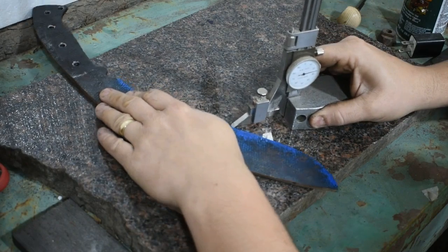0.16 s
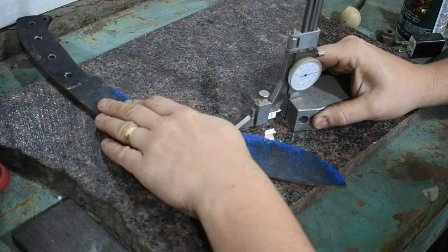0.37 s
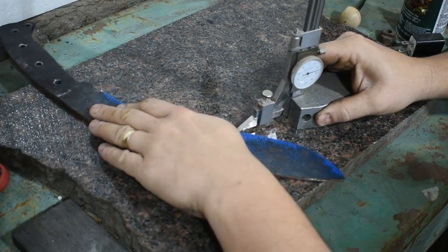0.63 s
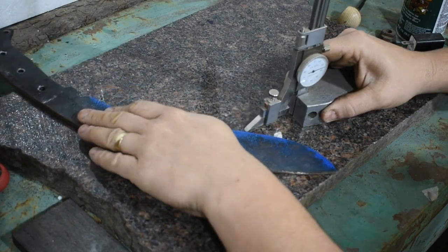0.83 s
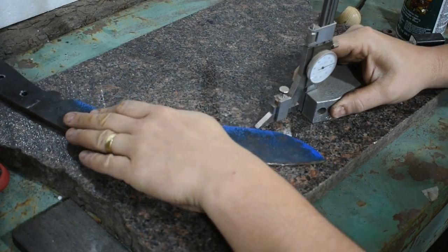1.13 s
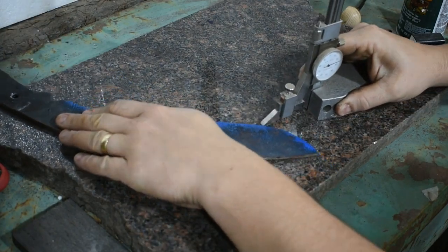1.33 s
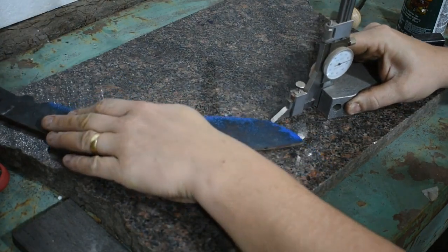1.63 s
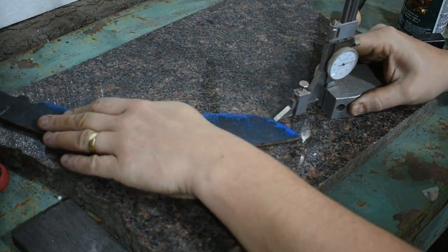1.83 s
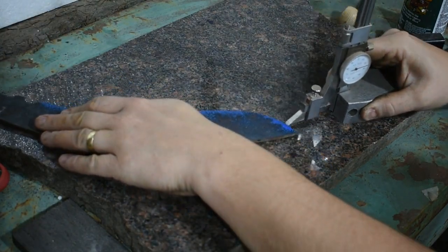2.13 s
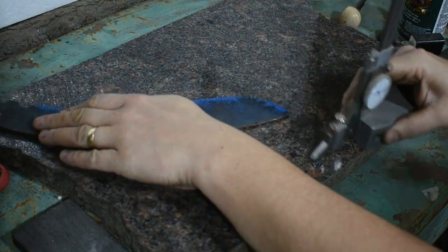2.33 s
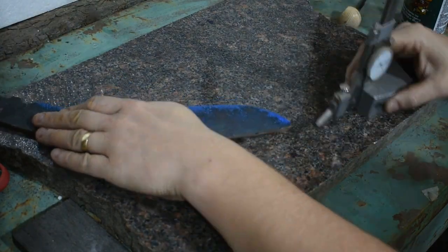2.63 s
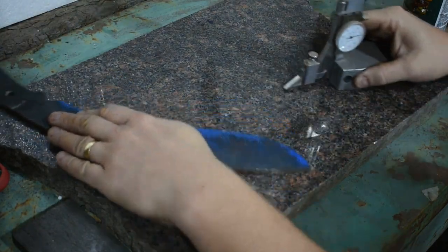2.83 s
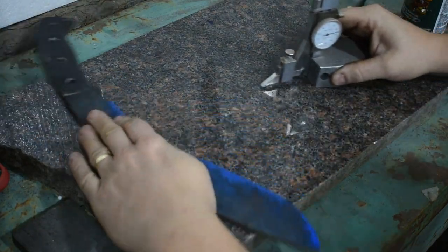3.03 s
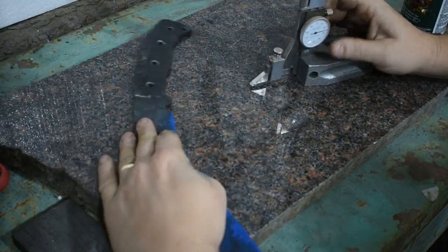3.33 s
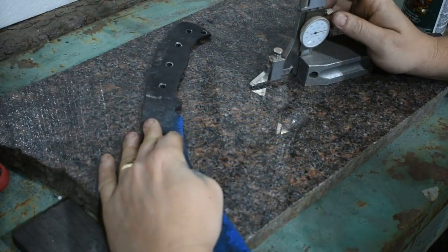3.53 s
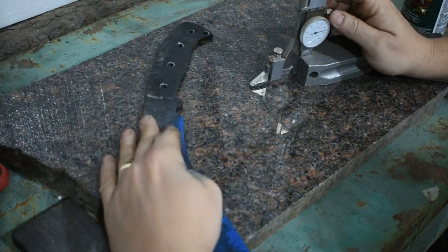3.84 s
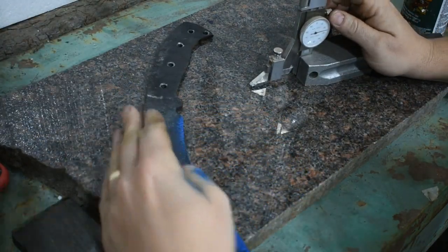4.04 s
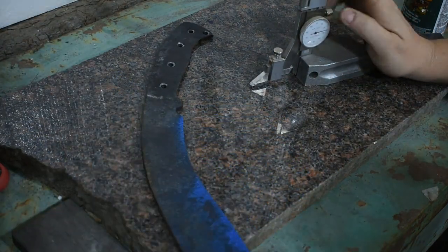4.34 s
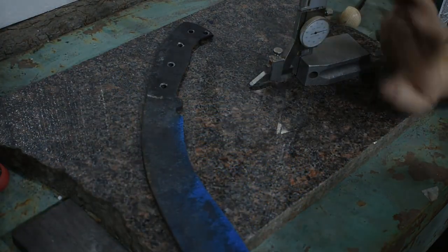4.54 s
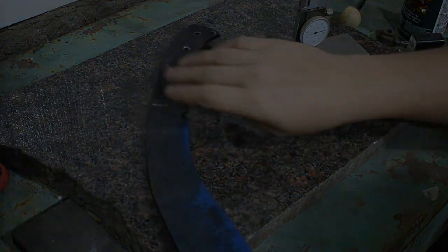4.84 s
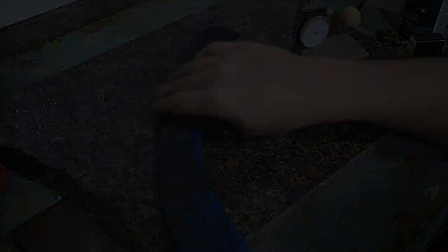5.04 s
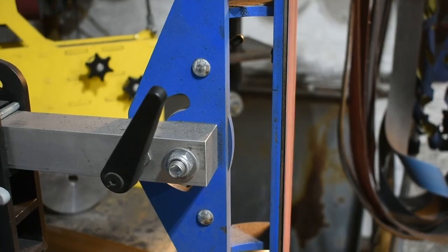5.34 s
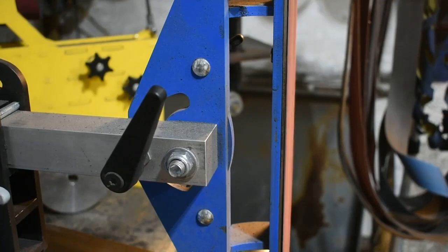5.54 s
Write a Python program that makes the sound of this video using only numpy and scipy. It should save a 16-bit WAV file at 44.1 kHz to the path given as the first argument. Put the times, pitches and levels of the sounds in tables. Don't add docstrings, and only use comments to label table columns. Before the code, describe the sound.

In a quiet workshop, a gauge's steel tip scrapes a blade blank on a granite plate in gritty, uneven strokes with tiny ticks. The scraping grows rougher, the tip slips off with a loud cluster of knocks, and the blank is swung round, clattering and settling. After near silence, a brief nudge and taps fade out. A belt grinder cuts in at full level, hissing and whining. Close microphone, short room reflections.

```python
import sys
import numpy as np
from scipy import signal
from scipy.fft import rfft, irfft, next_fast_len
from scipy.io import wavfile
from scipy.ndimage import uniform_filter1d, map_coordinates

SR = 44100
rng = np.random.default_rng(int(sys.argv[2]) if len(sys.argv) > 2 else 0)


def wav_record(signal):
    frames = np.transpose(np.atleast_2d(signal))
    bounded = np.clip(frames, -1, 1)
    quanta = np.round(bounded * 32767).astype(np.int16)
    wavfile.write(sys.argv[1], SR, quanta)


def gain_from_db(level_db):
    decades = np.asarray(level_db, float) / 20
    return 10 ** decades


N = 250488

# [f/Hz, level/dB per Hz]
AIR_SPECTRUM = [(15, -50.5), (25, -17.5), (80, -1.5), (333, -7.5), (392, -4), (672, -12.5), (955, -8),
                (1820, -12), (2030, -12.5), (3990, -17), (4570, -19), (15800, -29.5)]
# [t/s, level/dB]
AIR_FADE = [
    (0, -54.5),
    (4.5, -55.5),
    (4.8, -56.5),
    (5.0, -76.5),
    (5.12, -75),
    (5.25, -88),
    (5.68, -120),
]
# [f/Hz, t60/s]
ROOM_DECAY = [(200, 0.55), (2000, 0.25), (10000, 0.26)]

# [f/Hz, level/dB per Hz]
BELT_SPECTRUM = [(25, -41), (280, -36), (420, -20.5), (470, -12.5), (1400, -7.5), (2600, -10.5),
                 (5000, -9.5), (8600, -4), (10400, -15), (11800, -2), (13500, -6.5), (15800, -7.5)]
# [f/Hz, level/dB rms]
DRIVE_WHINE = [(4339, -49.5), (4775, -48.5), (5647, -46), (7596, -69), (8032, -59), (8904, -48),
               (9776, -49), (10417, -46), (10853, -53.5), (11289, -40), (11719, -44), (12161, -42),
               (13921, -52), (14185, -54), (14540, -52), (14896, -51), (15251, -42), (15628, -51.5)]
# [f/Hz, level/dB rms]
MOTOR_TONES = [(355, -62), (479.1, -51.5), (511.4, -48.5), (710.6, -56.0), (764.4, -52), (1437, -48.5),
               (1717, -52.0), (1965, -52.5), (2331, -53.5)]
# [t/s, level/dB]
GRINDER_LEVEL = [
    (0, -140),
    (5.2605, -140),
    (5.263, -35),
    (5.29, -30.5),
    (5.4, -31),
    (5.68, -31),
]
# [t/s, speed share, level/dB]
MOTOR_LOAD = [
    (0, 1, 0),
    (5.555, 1, 0),
    (5.62, .84, -5),
    (5.68, .82, -7),
]
# [t/s, half length/s, f/Hz, level/dB]
SEAM_MOAN = (5.605, 0.035, 813, -11)

# [t/s, level/dB, f/Hz, t60/s, slap level/dB]
BENCH_THUDS = [
    (0.005, -54, 313, 0.13, 12),
    (2.29, -32.5, 213, 0.12, -24),
    (2.519, -46, 204, 0.1, 4),
    (2.839, -39, 216, 0.068, 3),
    (3.218, -35, 136, 0.23, 1),
    (3.498, -53, 85.6, 0.51, -11),
    (4.399, -52, 239, 0.11, 2.5),
    (4.179, -58.5, 404, .06, 2),
    (4.516, -43, 243.5, 0.24, 5.5),
               (3.872, -50, 128, 1.9, 3),
]
# [f/Hz, level/dB per Hz]
SLAP_SPECTRUM = [(120, -31.5), (200, 2.5), (430, 1.5), (700, 1), (1100, -21), (2500, -32.5)]

# [t/s, peak level/dB]
BASE_TAPS = [(.072, -38), (2.108, -26), (2.177, -18), (2.491, -28), (2.514, -19), (2.578, -23),
             (3.003, -20), (3.012, -19), (3.213, -18), (4.731, -31), (4.756, -34), (4.863, -40)]
# [f/Hz, width/Hz, level/dB]
BASE_MODES = [(554, 100, -2), (644, 36, 0.5), (665, 44, 5), (995, 290, -14), (1177, 63, 1), (1690, 300, 5),
              (1912, 75, 1.5), (2420, 67, -24), (2850, 57, -15.5)]
# [t/s, peak level/dB, ring level/dB re peak, contact/s]
KNOCK_EVENTS = [(0.154, -40.5, -22, 0.0028), (0.866, -36.5, 0.5, 0.0068), (1.336, -33, 0.5, 0.0026),
                (1.368, -40, 3, 0.0035), (1.443, -28.5, -20, 0.0032), (1.785, -38, -1, 0.0032),
                (2.178, -15, -44, 0.0027), (2.251, -3, -26.5, 0.0079), (2.267, -13, -26, 0.0053),
                (2.282, -1.5, -7.5, 0.004), (2.288, 1, -14.5, 0.0038), (2.297, -3.5, -27.5, 0.0033),
                (2.321, -15.5, -19.5, 0.0073), (2.513, -22, -34, 0.0043), (2.576, -21.5, -17, 0.005),
                (2.91, -33.5, 9, 0.0051), (3.002, -13, -2, 0.003), (3.010, -12, -3, 0.0058),
                (3.028, -19, -1.5, 0.006), (3.157, -31, 3, 0.006), (3.204, -15, -14, 0.0036),
                (3.289, -19.5, -11.5, 0.0014), (3.364, -33, 1, 0.0025), (3.407, -33.5, 3.5, 0.0019),
                (3.451, -31.5, -0.5, 0.0022), (4.726, -30.5, -5.5, 0.0074), (4.752, -30.5, -6.5, 0.0081),
                (4.861, -36, -1, 0.0063), (5.02, -54, 3.5, 0.014), (5.055, -58.5, 3, .01),
                (0.07, -46, 6.5, 0.0014), (0.205, -41.5, -8, 0.011), (0.23, -43, -10, 0.0055),
               (0.333, -44.5, 2, 0.0037), (0.352, -45.5, 1, 0.0036), (0.393, -38, 3, .004),
               (0.58, -47, 4.5, 0.0037), (0.665, -40, -1, .005), (0.893, -37.5, 0, 0.004),
               (0.965, -42.5, 2.5, .003), (1.017, -39.5, 0.5, 0.0041), (1.137, -39.5, 4.5, 0.0071),
               (1.216, -43.5, 4.5, .003), (1.241, -45, 7, .003), (1.275, -42, 6, 0.0051),
               (1.396, -35, -6.5, 0.0045), (1.53, -27.5, -9, 0.0039), (1.551, -33, -11.5, .006),
               (1.628, -32, -8, 0.0061), (1.665, -34, -7.5, .005), (1.745, -43.5, 6, 0.0028),
               (2.107, -27.5, -24, .004), (2.133, -31.5, -18.5, 0.0051), (2.433, -31.5, -18, 0.0048),
               (2.491, -30.5, -10.5, .003), (2.612, -30, -6, 0.0055), (2.684, -33.5, -18.5, 0.0064),
               (2.728, -32, -12, 0.0043), (2.836, -30, 1, 0.012), (2.88, -33.5, 5.5, 0.0071),
               (3.041, -31, 5.5, 0.0036), (3.121, -36.5, 3.5, 0.0055), (3.186, -32, 2, 0.0032),
               (3.213, -16.5, -10, 0.0012), (3.271, -37.5, 5.5, 0.0035), (4.18, -50, -7, 0.0018),
               (4.397, -60, 6, 0.0019), (4.683, -54, 5, 0.0045)]
# [f/Hz, level/dB per Hz]
TOCK_SPECTRUM = [(300, -42), (520, -21.5), (900, -14), (1700, 5), (3000, -2), (5000, -15.5), (9000, -42.5)]

# [t/s, pressure level/dB, brightness/dB]
FIRST_STROKE = [
    (0.04, -59.5, -6.5),
    (0.12, -50, -3),
    (0.19, -49, -3),
    (0.3, -46.5, 4.5),
    (0.37, -47.5, 1),
    (0.45, -66, 6.5),
    (0.55, -57, 1.5),
]
SCRIBE_STROKE = [(0.6, -52.5, 3), (0.66, -42, -2), (0.74, -46, 0), (0.8, -43.5, -2), (1.01, -44.5, -0.5),
                 (1.08, -47, -0.5), (1.2, -48, 0), (1.36, -43, -4), (1.4, -38, -5), (1.54, -34, -8.5),
                 (1.6, -37, -4), (1.71, -41, -7), (1.74, -49, -4), (1.85, -50, -5), (2.03, -45, -7.5)]
SLIP_STROKE = [(2.099, -41, -7), (2.15, -35.5, -12.5), (2.24, -27.5, -9.5), (2.27, -15.5, -15),
               (2.31, -28, -16), (2.35, -32, -9), (2.39, -39.5, -9), (2.47, -46, -11), (2.52, -31, -24),
               (2.6, -32, -18), (2.63, -42, -6.5), (2.79, -42, -5), (2.85, -36, 2), (2.9, -41, 2.5)]
TURN_STROKE = [(2.95, -44, 1.5), (3.01, -35.5, -5), (3.1, -46.5, 9.5), (3.14, -41, 1), (3.2, -35, -3.5),
               (3.3, -38.5, -7.5), (3.33, -49, 1.5), (3.47, -48.5, -1), (3.54, -69, 3), (3.6, -74, 5)]
NUDGE_STROKE = [
    (4.4, -84, 3),
    (4.675, -82, 8),
    (4.7, -51.5, -1.5),
    (4.76, -43, -4.5),
    (4.84, -55.5, 2),
    (4.95, -63, 2),
    (5.05, -63.5, 1),
    (5.14, -74, -11),
    (5.25, -81, -12),
]
# [stop t/s, build-up/s, level/dB]
FLAT_SLIDES = [
    (0.15, 0.045, -53.5),
    (2.849, 0.15, -37),
    (4.66, 0.094, -58),
    (5.2, .015, -60),
    (4.505, .003, -56),
    (4.533, .003, -55),
]
SLIDE_STOP_S = 0.018
# [f/Hz, level/dB per Hz]
BARE_SPECTRUM = [(1180, -40), (2000, -15.5), (2420, -2.5), (2610, -3), (3570, -7), (6650, -4.5),
                 (15800, -17.5)]
# [f/Hz, level/dB per Hz]
SKID_SPECTRUM = [(1200, -19), (2400, -1), (4000, -3.5), (7000, -1), (11000, -11), (15800, -16.5)]
# [f/Hz, level/dB per Hz]
RUMBLE_SPECTRUM = [(65, -31), (110, -3), (226, -0.5), (327, -19), (393, 0), (450, -13.5), (580, -41),
                   (990, -120)]
RUMBLE_DB, RUMBLE_FOLLOWS, USUAL_PRESSURE_DB = -57.5, 0.96, -44

POSE_STARTS = [
    0.55,
    2.089,
    2.849,
    2.995,
    3.2,
    4.0,
    4.831,
]
POSE_BARE_DB = [
    -7,
    -11.5,
    -6,
    -4,
    -11.5,
    -14,
    -17,
    -20,
]
# [sharpening of the modes, drift of their shares/dB]
POSE_GRIP = [
    (1.3, 2.6),
    (1.4, 2),
    (.8, 2.5),
    (1, 4.5),
    (.9, 5),
    (.8, 5.5),
    (1.1, 3),
    (1.2, 5),
]
# [f/Hz, width/Hz, level/dB]
HANDLE_MODES = [(706, 43, 2.5), (1143, 26, 7.5), (1681, 77, 11.5), (2596, 38, 2), (3200, 115, -12.0),
                (3790, 180, -12.0), (4860, 210, -9.5), (5530, 86, -11.0), (6000, 100, -6), (7620, 74, -14),
                (7890, 97, -10.0), (8850, 54, -8.0), (8750, 49, -14), (10130, 72, -14), (10770, 67, -15),
                (11300, 55, -16)]
# [f/Hz, width/Hz, level/dB]
PRESSED_MODES = [(391, 9.5, -9), (676.6, 37, 3), (955, 44, -9), (1104, 78, -5.5), (1667.5, 93, 3),
                 (2110, 8.3, -25), (2340, 49, -12.5), (3260, 28, -13.5), (3958, 190, -5), (4660, 44, -9.5),
                 (4930, 190, -10.5), (5680, 66, -9.5), (6090, 170, -13), (6900, 240, -20.5),
                 (6460, 45, -29), (7940, 83, -17), (8670, 75, -18.5), (9220, 200, -20), (10100, 47, -12),
                 (10900, 83, -18.5), (11500, 190, -25)]
# [f/Hz, width/Hz, level/dB]
LIFTED_MODES = [(674, 36.3, 1.5), (1093, 47, -3), (1256, 61, -2.5), (1683, 60, 1.5), (2420, 81, -9.5),
                (3240, 150, -16.5), (3800, 120, -11.5), (4190, 6.7, -17), (5060, 40, -14.5),
                (5690, 17, -12), (6450, 110, -20.5), (8650, 110, -22.5), (9060, 160, -34),
                (10370, 110, -26), (11670, 47, -39)]
# [f/Hz, width/Hz, swung level/dB, clattering level/dB, settling level/dB]
LOOSE_MODES = [(673, 10, 0, -3.5, -14), (975, 35, -9, -7.5, -12), (1155, 70, -7, -16, -9),
               (1520, 30, -9, -16, -7), (1673, 40, 4, 2, -2.5), (1770, 104, -9.5, 5, -11.5),
               (2330, 63, -10.5, -8.5, -12), (2827, 12, -18, -10, -7.5), (3227, 27, -1, -2, -3.5),
               (3660, 25, -9, -14, -19), (3860, 71, -2.5, -10, -5.5), (4400, 41, -0.5, -11, -2),
               (4885, 35, 0, -11.5, -2), (5380, 65, -8, -17, -10), (5840, 63, -3, -13.5, -2),
               (6430, 50, -17, -14, -13), (6750, 93, -11, -3.5, -1.5), (7570, 44, -8, -14, -5),
               (7770, 42, -18, -5, -4), (8600, 43, -15, -16, -9), (8870, 47, -3.5, -12, -5),
               (9730, 38, -17, -16, -8), (9940, 46, -2, -19, -8), (10700, 37, -14, -32, -14),
               (11330, 36, -3, -19, -11.5), (12050, 65, -11, -13, -20), (12700, 35, -11, -27, -19),
               (13660, 34, -26, -23, -28), (13450, 58, -26, -18, -17), (14150, 48, -21, -25, -16),
               (14800, 60, -29, -29, -18)]
# [f/Hz, width/Hz, level/dB]
NUDGED_MODES = [(678, 19, 3.5), (1228, 39, -3), (1774, 58, -3), (2100, 32, -19), (3140, 31, -21),
                (3590, 32, -21), (3890, 34, -14), (4430, 86, -21.5), (4740, 41, -18.5), (5430, 75, -12),
                (5820, 30, -9), (6400, 17, -23), (6710, 66, -7.5), (7360, 28, -16), (7760, 42, -11.5),
                (8600, 42, -17), (9730, 26, -26), (10050, 39, -17), (10770, 46, -17), (11400, 79, -28),
                (12000, 36, -25), (12700, 36, -18.5), (14000, 57, -26), (14600, 76, -34)]
# [f/Hz, width/Hz, level/dB]
ROCKING_MODES = [(678, 28, -2.5), (1243, 85, -5.5), (1710, 71, -1.5), (2220, 35, -15), (2450, 63, -10),
                 (2850, 110, -12.5), (3160, 72, -10), (3590, 28, -0.5), (3880, 53, -11), (4490, 54, -5),
                 (4720, 22, -7), (5400, 83, -6), (5750, 26, -9), (6460, 96, -5.5), (6750, 28, -5),
                 (7430, 90, -10), (8620, 65, -9), (9700, 56, -14), (10850, 68, -16), (11300, 56, -29),
                 (12100, 42, -16), (12700, 55, -25), (13400, 44, -26), (14600, 45, -24)]
# [f/Hz, width/Hz, level/dB]
COLUMN_MODES = [(521, 12, -8), (592, 26, -8.5), (1270, 17, -14.5)]

# [centre t/s, from f/Hz]
THIN_MOMENTS = [(.099, 1500), (.286, 1000), (.519, 1800), (.538, 1800), (.708, 3000), (.919, 1000),
                (.988, 1000), (1.075, 1000), (1.377, 1000), (1.586, 1500), (1.708, 3000), (2.146, 2500),
                (2.315, 4000), (2.469, 2500), (2.606, 3500), (2.958, 800), (3.097, 800), (3.197, 500),
                (3.428, 1500), (3.775, 3000), (4.094, 3000), (4.465, 3000), (4.558, 3000), (4.703, 1000),
                (4.889, 2500), (4.953, 2500), (5.047, 2500), (5.19, 2000), (5.215, 1000), (5.24, 500)]
THIN_S, TOP_HZ = 0.034, 15800


def unit(x):
    return x / np.sqrt(np.mean(x ** 2) + 1e-20)


def along(points, hz):
    f, v = np.transpose(points)
    return np.interp(np.log(hz + 1), np.log(f + 1), v)


def curves(rows):
    s, *columns = np.transpose(rows)
    return [np.interp(np.arange(N) / SR, s, column) for column in columns]


def wobble(rate, size=N):
    knots = rng.standard_normal(int(N * rate / SR) + 4)
    return map_coordinates(knots, [np.arange(size) * rate / SR])


def filtered(x, response):
    m = next_fast_len(N + SR // 2)
    return irfft(rfft(x, m) * response(np.fft.rfftfreq(m, 1 / SR)), m)[:N]


def coloured(x, spectrum):
    return unit(filtered(x, lambda hz: gain_from_db(along(spectrum, hz))))


def grit(spread_db, clump_db):
    clumps = clump_db * (wobble(35) + wobble(120))
    size = gain_from_db(spread_db * rng.exponential(size=N) + clumps)
    return unit(size * rng.standard_normal(N))


def ringing(x, modes, sharpen=1, wander_db=0):
    out = np.zeros(len(x))
    for k, (hz, width, db) in enumerate(modes):
        b, a = signal.iirpeak(hz, hz / width * sharpen, SR)
        share = gain_from_db(wander_db * wobble(24, size=len(x)))
        out += (-1) ** k * gain_from_db(db) * signal.lfilter(b, a, x * share)
    energy = sum(gain_from_db(db) ** 2 * np.pi * width / sharpen / SR for hz, width, db in modes)
    return out / np.sqrt(energy)


def tones(lines, flutter_db, drift, turned=np.arange(N) / SR):
    out = np.zeros(N)
    for k, (hz, db) in enumerate(lines):
        level = gain_from_db(db + 3 + flutter_db * wobble(24))
        out += level * np.sin(2 * np.pi * hz * turned + drift * wobble(40) + k * k)
    return out


def air():
    return gain_from_db(curves(AIR_FADE)[0] + 1.1 * wobble(7.6)) * coloured(rng.standard_normal(N), AIR_SPECTRUM)


def walls(x):
    hz, t, z = signal.stft(rng.standard_normal(SR // 2), SR, nperseg=256)
    decay = gain_from_db(-60 * t / along(ROOM_DECAY, hz)[:, None])
    tail = signal.istft(z * decay, SR, nperseg=256)[1]
    delayed = np.pad(x, (400, 0))
    return signal.fftconvolve(delayed, tail / np.linalg.norm(tail))[:N]


def grinder():
    belt = coloured(grit(spread_db=0.0, clump_db=0.74), BELT_SPECTRUM)
    speed, load_db = curves(MOTOR_LOAD)
    motor = gain_from_db(load_db) * tones(MOTOR_TONES, flutter_db=2.2, drift=0.6, turned=np.cumsum(speed) / SR)
    whine = gain_from_db(-1.5) * tones(DRIVE_WHINE, flutter_db=2.2, drift=0.9)
    s, half, hz, db = SEAM_MOAN
    since = np.arange(N) / SR - s
    glide = np.sin(2 * np.pi * hz * since * (1 - 0.44 * since))
    moan = gain_from_db(db) * np.exp(-(since / half) ** 2) * glide
    return gain_from_db(curves(GRINDER_LEVEL)[0]) * (belt + gain_from_db(29.5) * (motor + whine) + moan)


def thuds():
    out, t = np.zeros(N + SR), np.arange(SR) / SR
    noise = np.resize(coloured(rng.standard_normal(N), SLAP_SPECTRUM), N + SR)
    attack = 1 - np.exp(-t / 0.0022)
    for s, db, hz, t60, slap_db in BENCH_THUDS:
        start = round(s * SR)
        tone = gain_from_db(-60 * t / t60) * np.sin(2 * np.pi * hz * t)
        slap = gain_from_db(slap_db - 60 * t / 0.15) * noise[start:][:SR]
        out[start:][:SR] += gain_from_db(db) * attack * (tone + slap)
    return out[:N]


def taps():
    blows = np.zeros(N)
    for s, db in BASE_TAPS:
        blows[round(s * SR)] = gain_from_db(db + 20.5)
    pulses = np.convolve(blows, np.hanning(15) / 6, 'same')
    return ringing(pulses, BASE_MODES, sharpen=0.45)


def knocks():
    low, high, t = np.zeros(N + SR), np.zeros(N + SR), np.arange(SR // 10) / SR
    for s, db, ring_db, contact in KNOCK_EVENTS:
        start = round(s * SR)
        shape = np.exp(-t / max(contact, 3e-4)) * (1 - np.exp(-t / (0.23 * contact)))
        push = np.sign(rng.standard_normal((2, len(t)))) * shape
        low[start:][:len(t)] += gain_from_db(db) * push[0]
        high[start:][:len(t)] += gain_from_db(db + ring_db) * push[1]
    return low[:N], high[:N]


def slide_level():
    t, level = np.arange(N) / SR, np.zeros(N)
    for s, rise, db in FLAT_SLIDES:
        level += gain_from_db(db) * np.exp(-np.where(t < s, (t - s) / rise, (t - s) / SLIDE_STOP_S) ** 2)
    return level


def scrape():
    pressure_db, bright_db = curves(FIRST_STROKE + SCRIBE_STROKE + SLIP_STROKE + TURN_STROKE + NUDGE_STROKE)
    ring_db = pressure_db + bright_db
    low = gain_from_db(pressure_db + 0.2) * grit(spread_db=2.5, clump_db=1.46)
    high = gain_from_db(ring_db - 1.87) * grit(spread_db=3.5, clump_db=0.72)
    pose = np.searchsorted(POSE_STARTS, np.arange(N) / SR)
    bare_level = gain_from_db(ring_db + np.take(POSE_BARE_DB, pose))
    bare = bare_level * coloured(grit(spread_db=3.0, clump_db=3.0), BARE_SPECTRUM)
    skid = slide_level() * coloured(grit(spread_db=2.5, clump_db=1.8), SKID_SPECTRUM)
    rumble_db = RUMBLE_DB + RUMBLE_FOLLOWS * np.minimum(pressure_db - USUAL_PRESSURE_DB, 12)
    rumble = gain_from_db(rumble_db + 2.3 * wobble(16)) * coloured(rng.standard_normal(N), RUMBLE_SPECTRUM)
    return low, high, bare + skid + rumble


def steel(low_force, high_force):
    edges = [0] + [round(s * SR) for s in POSE_STARTS] + [N]
    tail = SR // 4
    out = np.zeros((2, N + tail))
    free = [[(hz, width, dbs[k]) for hz, width, *dbs in LOOSE_MODES] for k in range(3)]
    poses = [HANDLE_MODES, PRESSED_MODES, LIFTED_MODES, *free, NUDGED_MODES, ROCKING_MODES]
    for k, modes in enumerate(poses):
        body = [m for m in modes if m[0] < 2600]
        ring = [m for m in modes if m[0] >= 2600]
        sharpen, wander_db = POSE_GRIP[k]
        low = np.pad(low_force[edges[k]:edges[k + 1]], (0, tail))
        high = np.pad(high_force[edges[k]:edges[k + 1]], (0, tail))
        out[0, edges[k]:][:len(low)] += ringing(low, body + COLUMN_MODES, 1.15 * sharpen, 0.71 * wander_db)
        out[1, edges[k]:][:len(low)] += ringing(high, ring, sharpen, wander_db)
    return out[:, :N]


def scribing():
    drag_low, drag_high, rub = scrape()
    hit_low, hit_high = knocks()
    body, ring = steel(drag_low + gain_from_db(-4) * hit_low, drag_high + gain_from_db(2.0) * hit_high)
    base = gain_from_db(-5.5) * ringing(hit_low, BASE_MODES)
    tock = gain_from_db(-7.5) * coloured(hit_low, TOCK_SPECTRUM) * np.std(hit_low)
    crack = gain_from_db(-7.5) * coloured(hit_high, BARE_SPECTRUM) * np.std(hit_high)
    return body + ring + rub + base + tock + crack


def scene():
    bench = scribing() + taps() + thuds()
    fade = np.interp(np.arange(N) / SR, [5.12, 5.245], [1, 0])
    return ((bench + gain_from_db(-9.5) * walls(bench) + air()) * fade + grinder())[None]


def thinned(x, keep=1.35, depth_db=-17):
    hz, t, z = signal.stft(x, SR, nperseg=1024, noverlap=896)
    near = uniform_filter1d(np.abs(z), size=5, axis=1)
    around = uniform_filter1d(near, size=40, axis=0)
    weak = 1 / (1 + (near / (keep * around + 1e-12)) ** 8)
    gap = np.zeros(z.shape)
    for s, from_hz in THIN_MOMENTS:
        gap += np.clip(1.6 - 4 * np.abs(t - s) / THIN_S, 0, 1) * (hz[:, None] > from_hz)
    return signal.istft(z * gain_from_db(depth_db * weak * gap), SR, nperseg=1024, noverlap=896)[1][:N]


def low_pass(x):
    return signal.sosfilt(signal.butter(12, 16850, fs=SR, output="sos"), x)


def record(dry):
    clipped = dry[0] / (1 + np.abs(dry[0]) ** 6) ** (1 / 6)

    def band(hz):
        low_cut = hz ** 2 / (hz ** 2 + 30 ** 2)
        return np.clip((TOP_HZ - hz) / 200 + 0.5, 0, 1) ** 2 * low_cut

    mix = thinned(filtered(clipped, band))
    return low_pass(mix[None])


dry = scene()
out = record(dry)
wav_record(out)
```